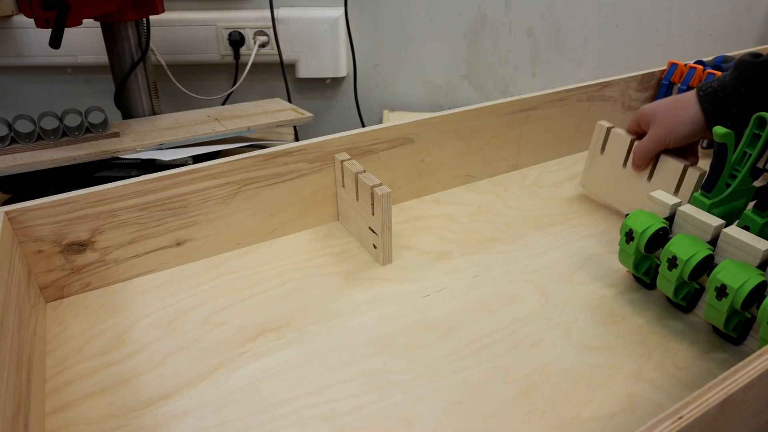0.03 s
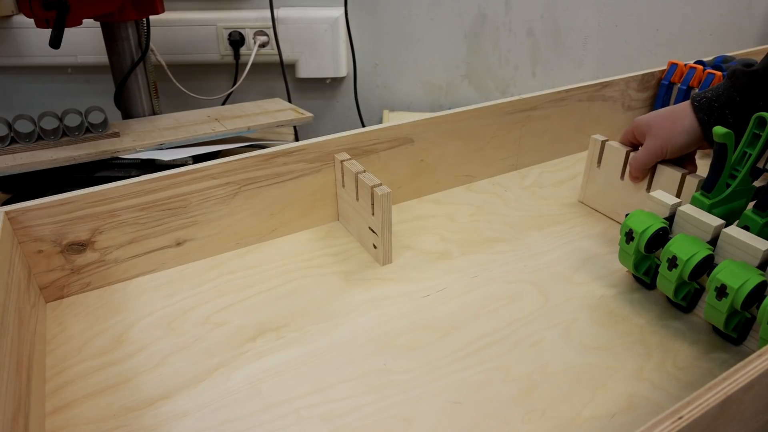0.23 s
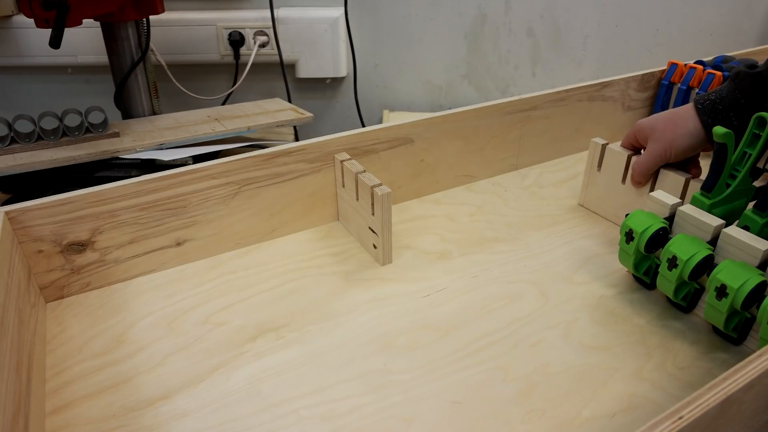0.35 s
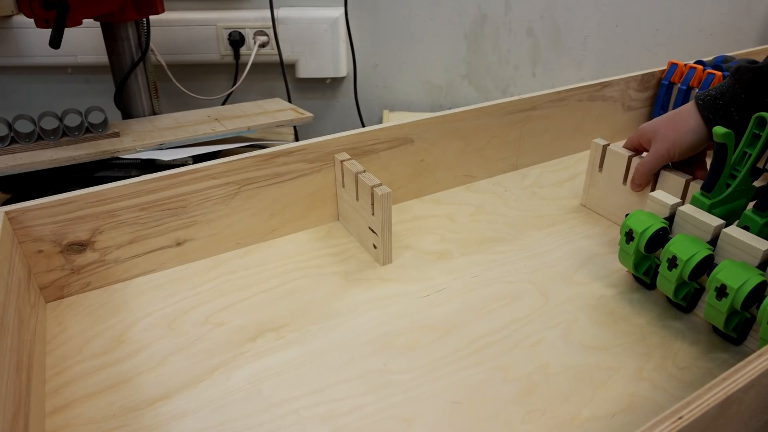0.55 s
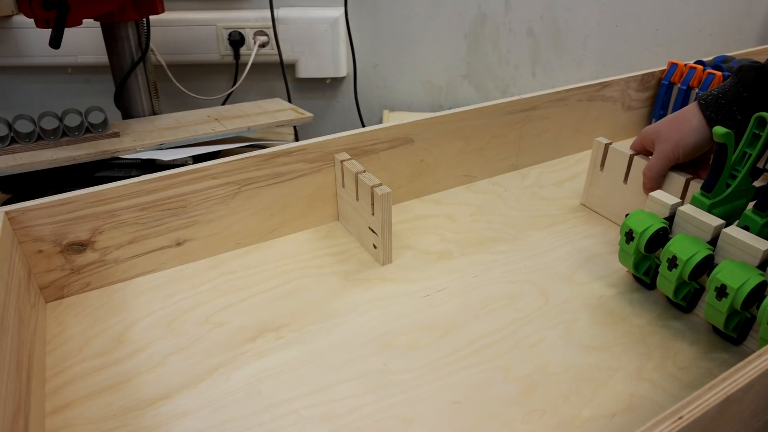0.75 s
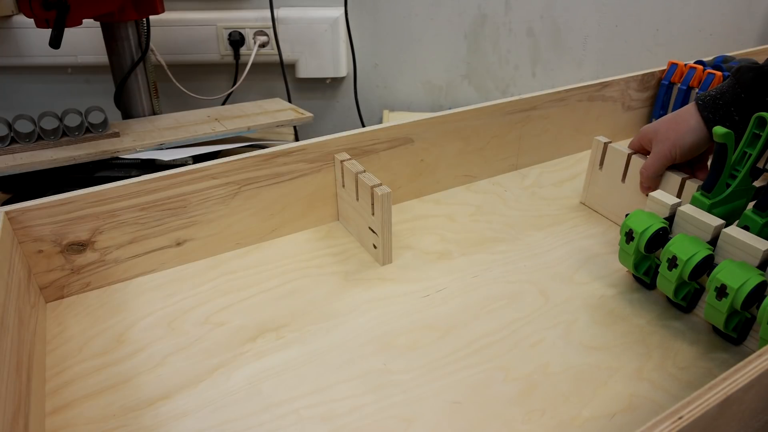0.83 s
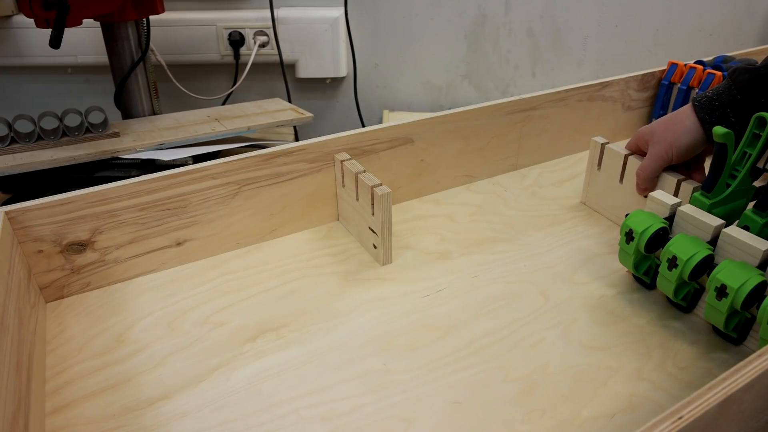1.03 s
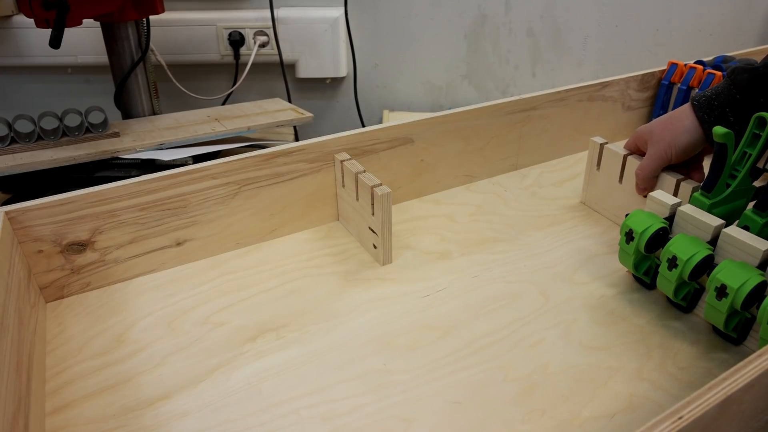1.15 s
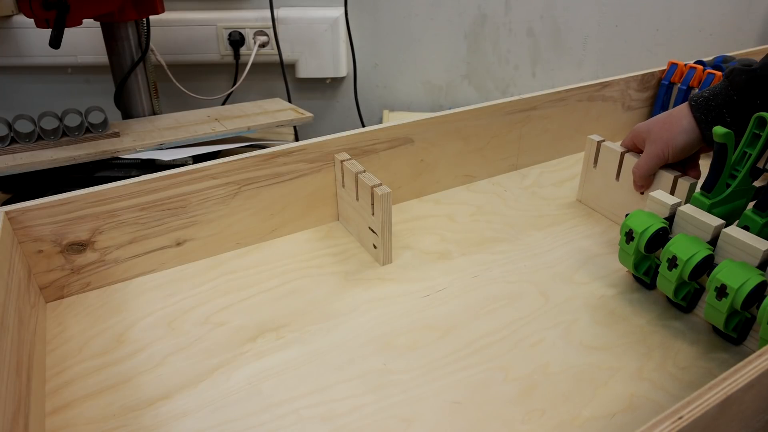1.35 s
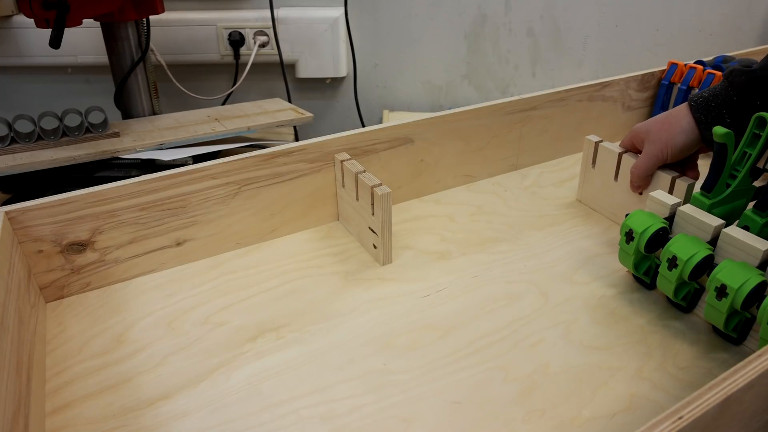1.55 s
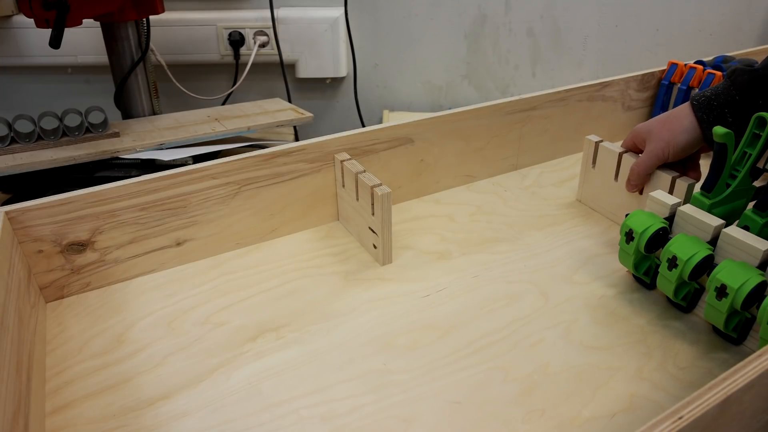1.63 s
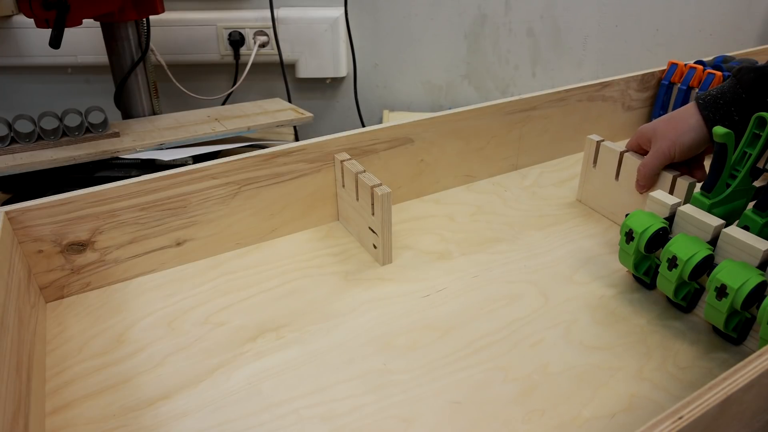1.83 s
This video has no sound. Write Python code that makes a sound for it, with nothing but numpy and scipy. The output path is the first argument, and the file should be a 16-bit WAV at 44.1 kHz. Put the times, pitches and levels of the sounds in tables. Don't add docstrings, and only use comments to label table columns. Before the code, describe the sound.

A wooden block touches down and slaps flat on a plywood box floor, then gets one more knock; soft scuffs and cloth rustles follow over quiet hum in a live workshop, heard fairly close in stereo.

```python
import sys
import numpy as np
from scipy import signal
from scipy.fft import rfft, irfft
from scipy.io import wavfile

SR = 44100
rng = np.random.default_rng(int(sys.argv[2]) if len(sys.argv) > 2 else 0)


def undo_db(level):
    steps = np.asarray(level, float) / 20
    return 10 ** steps


def pcm_store(signal):
    levels = np.round(np.clip(np.atleast_2d(signal), -1, 1) * 32767)
    wavfile.write(sys.argv[1], SR, levels.astype(np.int16).T)


N = 83790
LEAD_S = 0.2
T = np.arange(N + round(LEAD_S * SR)) / SR - LEAD_S

# (frequency [Hz], density [dB/Hz])
HUM_SPECTRUM = [(25, -34), (110, -22), (400, -7), (850, -12), (1250, -14.5), (1850, -10.5), (4000, -20),
                (11500, -43), (13000, -71.5)]
# (frequency [Hz], likeness [0-1])
HUM_LIKENESS = [(60, .9), (300, 0.29), (1000, 1), (3000, 0.31), (10000, 0.13)]
HUM_DB = -68

# (start [s], hold [s], level [dB], centre [Hz], width [octaves])
SWISHES = [(-.08, 0.094, -66, 2177, 0.88), (-.05, 0.13, -76.5, 4500, 0.84), (.30, .08, -79.5, 5487, 0.39),
           (0.614, .08, -74, 4180, 0.43), (0.758, 0.03, -75, 6900, 0.34), (.79, 0.053, -76.5, 5230, 0.586),
           (0.866, .04, -78, 4354, 0.38), (1.092, 0.21, -80.5, 2501, 0.63), (1.17, 0.075, -86.5, 6040, .7),
           (1.334, .09, -78.5, 4170, 0.58), (1.52, 0.0045, -86, 7000, .8), (1.655, .055, -69, 4400, 0.65),
           (1.793, .06, -77, 4000, 0.42)]
SWISH_RISE_S, SWISH_FALL_S = 0.0028, 0.023
SWISH_SKIRT_DB, SWISH_ROOM_DB, SWISH_SIDE_GAIN = -14.5, -3, 0.87

# (start [s], level [dB], centre [Hz],
# decay [ms])
CRACKS = [(0.1979, -39.5, 505.2, 2.6), (0.199, -59, 2300, 21), (0.2363, -40, 2940, 6.8),
          (0.2346, -46.5, 4300, 3.2), (.2395, -59, 7620, 2.2), (0.239, -76, 13000, 3.6),
          (.4555, -56, 5440, 0.86), (0.4571, -56, 3200, 6), (.4665, -59, 5250, 1.5), (.765, -93, 14000, 15),
          (1.662, -89, 14000, 15)]

# (start [s], strength [dB], contact [ms], room [dB], build-up [ms])
KNOCKS = [
    (0.2015, -15.5, .3, -14, 1.2),
    (0.236, -12, 0.052, -8.5, 0.57),
    (0.4554, -17.5, 0.074, -9.5, 2.3),
]
# (frequency [Hz], level [dB], t60 [s])
RINGS = [
    [(104.8, -22.5, 0.38), (250, -0.5, 0.047), (330, 4, 0.063), (421, -1.5, 0.31), (656, -6, .08),
     (875, -4, .08), (1040, -8.5, 0.053), (1080, -5.5, .05)],
    [(106, -28.5, 0.7), (289, 0, 0.063), (443.4, -28.5, 0.16), (524, -13.5, .05), (650, -3, .06),
     (769.7, -2.5, 0.065), (841, 10, 0.045), (966, -5, .05), (1200, -25, 0.06), (1697, 6.5, 0.032),
     (1849, 2.5, 0.062), (2371, -2.5, .05), (2600, -10.5, 0.064), (3060, -14.5, 0.024)],
    [(101, -20, .6), (300, -4.5, 0.12), (379, 1.5, 0.16), (680, -5, 0.24), (787, 7.5, 0.038), (880, 5, .08),
     (1089, 6, 0.091), (1307, -6, 0.023), (1470, -21.5, 0.027), (2050, -3, 0.037), (2300, -8.5, 0.042),
     (3200, -13.5, 0.051), (4000, -46.5, 0.026)],
]
# (delay [s], level [dB], left-right [dB])
ECHOES = [(.004, -6, -2), (.0078, 1.5, 6.5), (.012, -5.5, 0.5), (.018, -25.5, -1.5), (.0305, -17.5, 1),
          (.035, -8, -3.5), (.047, -31.5, 8)]
# (frequency [Hz], density [dB/Hz])
PANEL_SPECTRUM = [(80, -34), (200, -5.5), (300, -4.5), (900, -4), (1700, -8.5), (2600, -18), (4200, -36),
                  (12000, -74.5)]
KNOCK_CUT_HZ, PANEL_DECAY_MS, PANEL_DB = 208, 3.9, -7
ROOM_MODES_DB, ROOM_PANEL_DB, KNOCK_PAN_DB = -13, 0.5, -1.5

# (start [s], length [s], level [dB], ring pitch [Hz], ring level [dB])
SHUFFLES = [
    (0.874, 0.066, -56, 238, 10),
    (0.95, 0.44, -74.5, 200.3, 2.5),
    (1.321, 0.091, -57.5, 653, 5),
    (1.347, 0.11, -62.5, 238.5, 1.5),
    (1.387, 0.071, -56, 880, 8.5),
    (1.461, 0.019, -63.5, 300, 2.5),
    (1.501, 0.065, -63.5, 680, 3.5),
    (1.574, 0.013, -76, 230, 7),
    (1.657, 0.056, -70, 450, 8.5),
]
# (frequency [Hz], density [dB/Hz])
SHUFFLE_SPECTRUM = [(50, -31.5), (110, -11), (250, 3.5), (450, -7), (850, -8), (1300, -14), (3000, -20.5),
                    (8000, -49)]
SHUFFLE_BUMPS_PER_S, SHUFFLE_SPREAD_DB, SHUFFLE_ROOM_DB, SHUFFLE_RING_OCT = 1500, -6.5, -4, 0.13

# (frequency [Hz], t60 [s])
HALL_DECAY = [(100, 0.7), (260, 0.76), (700, 0.82), (1840, 0.7), (4850, 0.55)]
# (frequency [Hz], likeness [0-1])
HALL_LIKENESS = [(60, 0.88), (130, 1), (270, 1), (590, .78), (1260, 0.38), (2690, 0.15), (6000, .3)]
HALL_RISE_S = 0.015
LAG_S = 0.00007


def evened(x):
    return x / np.sqrt(np.mean(x ** 2) + 1e-20)


def read(points, hz):
    f, value = np.transpose(points)
    return np.interp(np.log(hz + 1), np.log(f + 1), value)


def colour(x, gain_db):
    hz = np.fft.rfftfreq(x.shape[-1], 1 / SR)
    return irfft(rfft(x) * undo_db(gain_db(hz)), x.shape[-1])


def octaves_from(hz, centre_hz):
    return np.log2((hz + 50) / centre_hz)


def causal(points):
    hz = abs(np.fft.fftfreq(8192, 1 / SR))
    log_gain = np.log(undo_db(read(points, hz)))
    return np.fft.ifft(np.exp(np.conj(signal.hilbert(log_gain)))).real[:4096]


def noise_pair(likeness, shape_db):
    frames = len(T) // 128 + 5
    hz = np.fft.rfftfreq(512, 1 / SR)[:, None]
    a, b, c, d = rng.standard_normal((frames, 257, 4)).T
    like = np.clip(read(likeness, hz), 0, 1)
    right = a + 1j * b
    shared = like * right * np.exp(-2j * np.pi * hz * LAG_S)
    left = shared + np.sqrt(1 - like ** 2) * (c + 1j * d)
    spectra = np.array([left, right]) * undo_db(shape_db(hz, np.arange(frames) * 128 / SR))
    return signal.istft(spectra, nperseg=512, noverlap=384)[1][:, :len(T)]


def hall(x):
    tail = noise_pair(HALL_LIKENESS, lambda hz, t: -60 * t / read(HALL_DECAY, hz))
    tail = tail * (1 - np.exp(-((T + LEAD_S) / HALL_RISE_S) ** 2))
    tail = tail / np.linalg.norm(tail[0])
    return signal.fftconvolve(x[None], tail, axes=1)[:, :len(T)]


def place(x, pan_db, delay_s=0., lag=1):
    hz = np.fft.rfftfreq(len(x), 1 / SR)
    delays_s = delay_s + np.array([[lag * LAG_S], [0]])
    late = irfft(rfft(x) * np.exp(-2j * np.pi * hz * delays_s), len(x))
    return late * undo_db([[pan_db / 2], [-pan_db / 2]])


def hum():
    noise = noise_pair(HUM_LIKENESS, lambda hz, t: 0 * t)
    return undo_db(HUM_DB) * evened(colour(noise, lambda hz: read(HUM_SPECTRUM, hz)))


def swish_hump(centre_hz, octaves):
    def gain_db(hz):
        away = octaves_from(hz, centre_hz)
        return np.maximum(-6 * (away / octaves) ** 2, SWISH_SKIRT_DB - 6 * abs(away))
    return gain_db


def swishes():
    out = np.zeros((2, len(T)))
    for start, hold, db, centre_hz, octaves in SWISHES:
        air = evened(colour(rng.standard_normal((2, len(T))), swish_hump(centre_hz, octaves)))
        rise = np.clip((T - start) / SWISH_RISE_S, 0, 1)
        fall = np.exp(-np.maximum(T - start - hold, 0) / SWISH_FALL_S)
        out += undo_db(db) * air * rise * fall
    mid, side = out
    near = mid + SWISH_SIDE_GAIN * np.array([[1], [-1]]) * side
    return near * undo_db([[-.6], [.6]]) + undo_db(SWISH_ROOM_DB) * hall(mid)


def cracks():
    out = np.zeros(len(T))
    for start, db, centre_hz, decay_ms in CRACKS:
        noise = rng.standard_normal(len(T))
        air = evened(colour(noise, lambda hz: -6 * (octaves_from(hz, centre_hz) / 0.27) ** 2))
        rise = np.clip((T - start) * 3000, 0, 1)
        out += undo_db(db) * air * rise * np.exp(-np.maximum(T - start, 0) * 1000 / decay_ms)
    return place(out, KNOCK_PAN_DB, lag=0.55) + undo_db(-11.5) * place(out, 1.2, 0.0077)


def knock(row, ring):
    start, db, contact_ms, room_db, rise_ms = row
    t = np.maximum(T - start, 0)
    pole = np.exp(-1000 / SR / contact_ms)

    def push(x):
        return undo_db(db) * signal.lfilter([(1 - pole) ** 2], [1, -2 * pole, pole * pole], x)

    rise = 1 - np.exp(-t * 1000 / rise_ms)
    modes = rise * sum(undo_db(d - 60 * t / t60) * np.sin(2 * np.pi * hz * t) for hz, d, t60 in ring)

    def through_panel(x):
        x = signal.oaconvolve(x, causal(PANEL_SPECTRUM))[:len(T)]
        return x * np.linalg.norm(modes) / np.linalg.norm(x)

    panel = through_panel(rng.standard_normal(len(T)) * np.exp(-t * 1000 / PANEL_DECAY_MS) * rise)
    thud = through_panel(np.sinc(SR * (T - start - .001)))
    blow = push(modes + undo_db(PANEL_DB) * panel) / 2
    near = place(blow, KNOCK_PAN_DB)
    near = near + sum(undo_db(d + room_db) * place(blow, pan_db, s) for s, d, pan_db in ECHOES)
    to_room = push(undo_db(ROOM_MODES_DB) * modes + undo_db(ROOM_PANEL_DB) * thud)
    return near + undo_db(room_db) * hall(to_room)


def knocks():
    blows = sum(knock(row, ring) for row, ring in zip(KNOCKS, RINGS))
    return signal.sosfilt(signal.butter(2, KNOCK_CUT_HZ, "high", fs=SR, output="sos"), blows)


def shuffles():
    out = np.zeros(len(T))
    for start, length, db, ring_hz, ring_db in SHUFFLES:
        def gain_db(hz):
            away = np.log2((hz + 1) / ring_hz) / SHUFFLE_RING_OCT
            return read(SHUFFLE_SPECTRUM, hz) + ring_db * np.exp(-away ** 2)

        bumps = (rng.random(len(T)) < SHUFFLE_BUMPS_PER_S / SR) * rng.standard_normal(len(T))
        bumps = bumps * undo_db(SHUFFLE_SPREAD_DB * np.minimum(rng.exponential(1, len(T)), 2))
        bumps = bumps + 0.01 * rng.standard_normal(len(T))
        swell = np.sin(np.pi * np.clip((T - start) / length, 0, 1)) ** 2
        out += undo_db(db) * evened(colour(bumps, gain_db)) * swell
    return place(out, 0) + undo_db(SHUFFLE_ROOM_DB) * hall(out)


def scene():
    return (hum() + swishes() + cracks() + knocks() + shuffles())[:, -N:]


def roll_off(x):
    return signal.sosfilt(signal.butter(12, 15400, fs=SR, output="sos"), x)


def record(dry):
    return roll_off(dry)


dry = scene()
out = record(dry)
pcm_store(out)
```